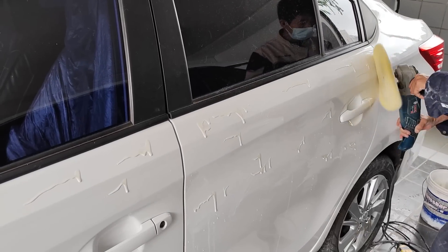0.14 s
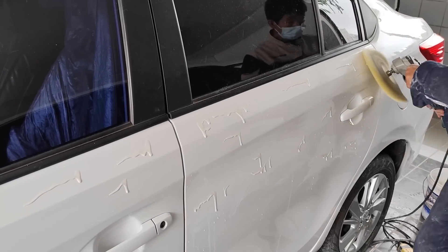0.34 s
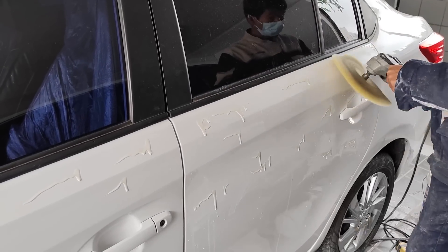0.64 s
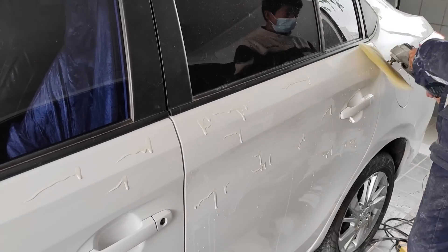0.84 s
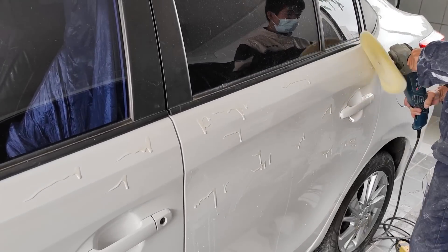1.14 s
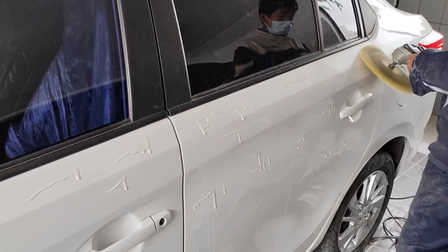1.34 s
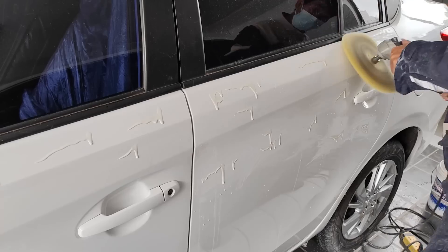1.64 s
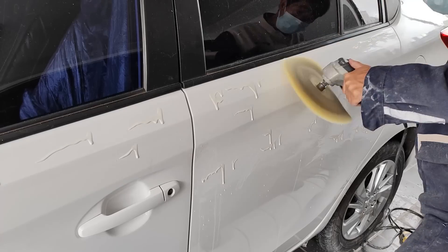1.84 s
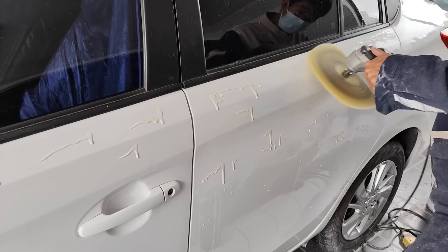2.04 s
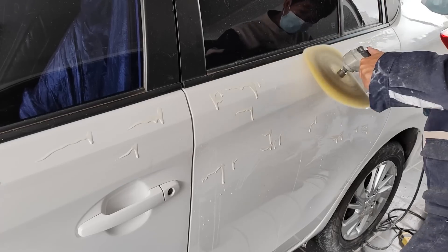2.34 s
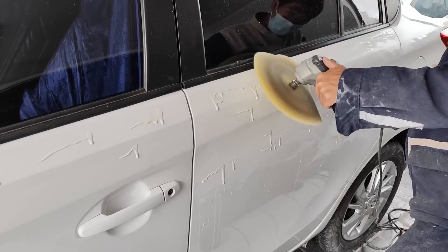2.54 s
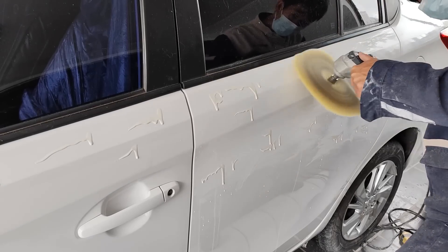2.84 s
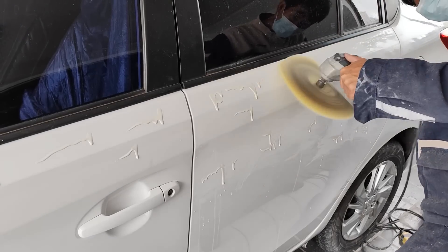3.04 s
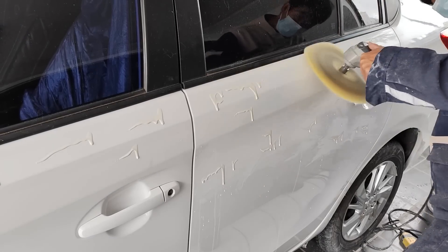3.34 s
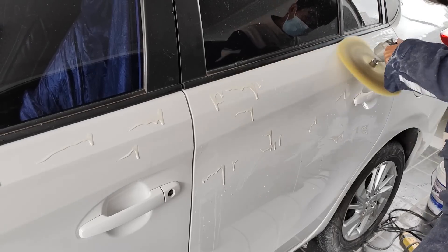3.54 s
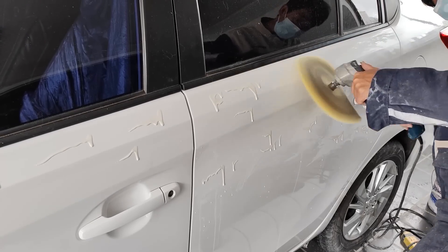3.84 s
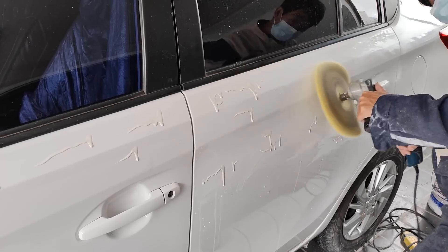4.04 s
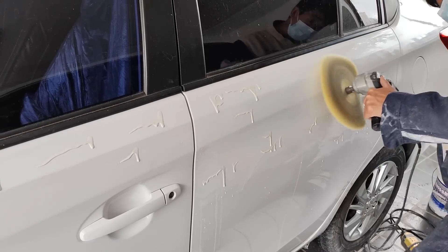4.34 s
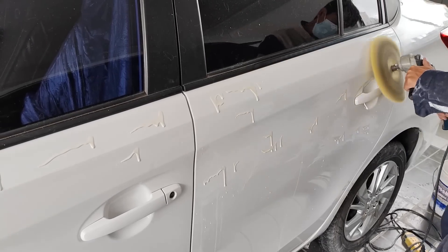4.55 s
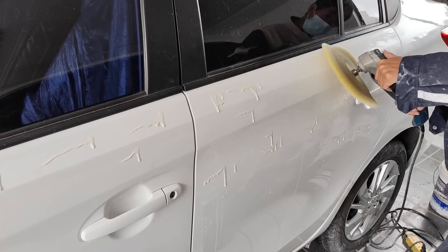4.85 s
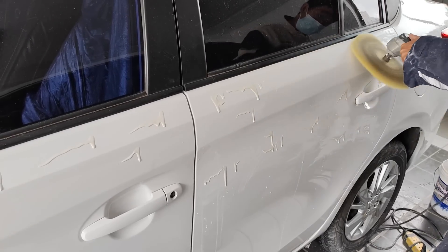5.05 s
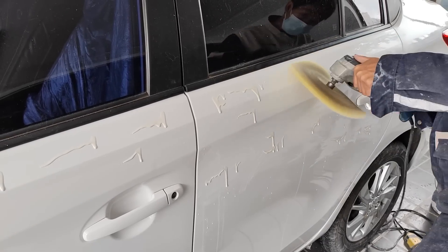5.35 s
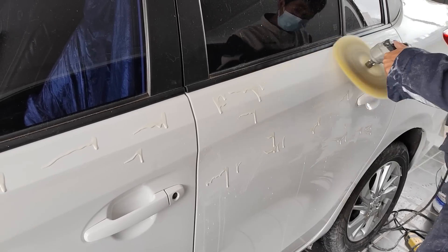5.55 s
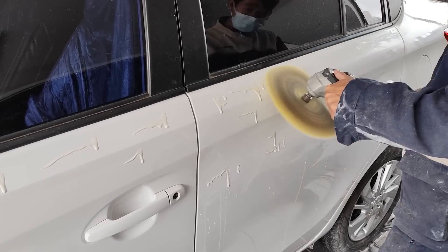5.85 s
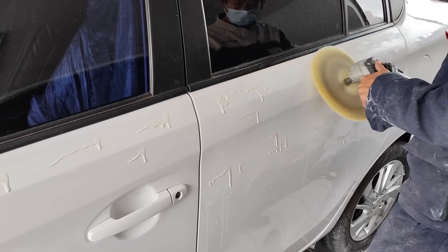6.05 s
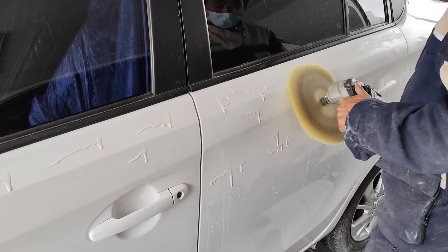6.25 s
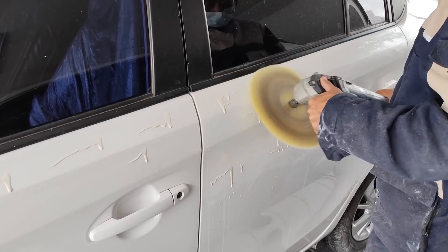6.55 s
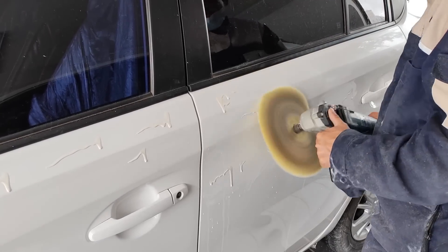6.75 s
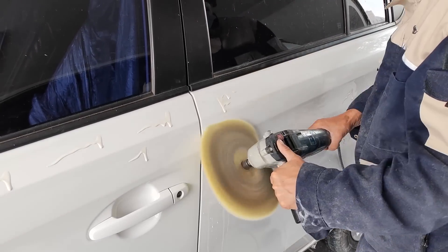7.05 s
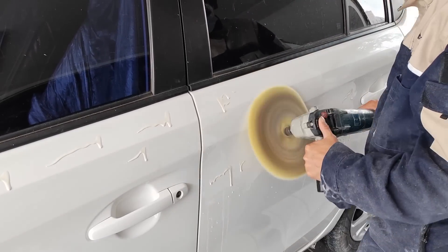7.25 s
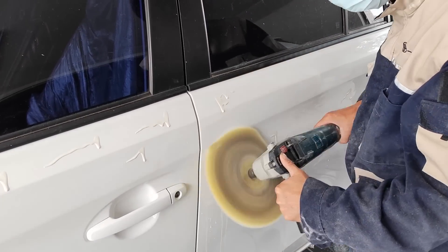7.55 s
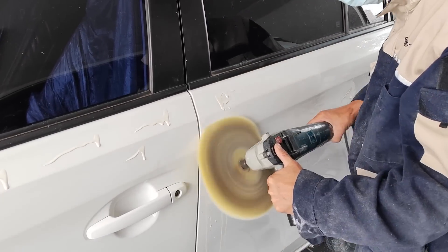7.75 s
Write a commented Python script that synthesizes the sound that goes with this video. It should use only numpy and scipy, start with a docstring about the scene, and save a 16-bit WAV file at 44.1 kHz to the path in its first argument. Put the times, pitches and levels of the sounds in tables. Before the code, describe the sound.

An electric rotary polisher whines shrilly and steadily while its foam pad rubs a car door, with gear rattle, hissing air and small speed sags.

```python
"""In a body shop, an electric rotary polisher buffs a car door: it comes nearer, goes off, then comes closest
near the end. The motor's whine is built from sine waves; it sags and recovers with the pressure on the pad,
and the ripple of the power supply adds further tones beside it. Knocks once a turn and tooth noise make
the gear case ring; shaped noise makes the hiss of cooling air and brushes; the foam pad rubs the door
panel and makes it ring. Steady low tones, low booming and a soft bump lie underneath."""
import sys
import numpy as np
from scipy import signal
from scipy.fft import rfft, irfft, next_fast_len
from scipy.io import wavfile
from scipy.ndimage import uniform_filter1d, map_coordinates

SR = 44100
rng = np.random.default_rng(int(sys.argv[2]) if len(sys.argv) > 2 else 0)


def wav_out(sig):
    """Save sig, one row per channel (or a flat mono array), as 16-bit PCM at SR to the path in sys.argv[1]."""
    wavfile.write(sys.argv[1], SR, np.round(np.clip(np.atleast_2d(sig).T, -1, 1) * 32767).astype(np.int16))


N = 348831
TIME = np.arange(N) / SR   # seconds
WORKING_HZ, RIPPLE_HZ = 1032, 300   # typical pitch of the whine; ripple of the supply
SHAFT_TURNS_PER_CYCLE = .07907   # turns of the geared shaft for each cycle of the whine


def from_db(db):
    """Decibels to gain."""
    return 10 ** (np.asarray(db) / 20)


def rms_one(x):
    """Scale to unit power."""
    return x / np.sqrt(np.mean(np.abs(x) ** 2) + 1e-20)


def in_time(rows):
    """Draw straight lines between the rows of a table: each column at every sample."""
    s, *columns = np.transpose(rows)
    return [np.interp(TIME, s, c) for c in columns]


def at_hz(points, hz):
    """Read a table of frequencies on a logarithmic pitch axis."""
    f, value = np.transpose(points)
    return np.interp(np.log(hz), np.log(f), value)


def drift(rate, size=100):
    """Slow random wandering of spread 1, one value for every `size` samples."""
    r = np.exp(-2 * np.pi * rate * size / SR)
    steps = N // size + 2
    chance = rng.standard_normal(2 * steps)
    # the first half only lets the filter settle
    return rms_one(signal.lfilter([1], [1, -2 * r, r * r], chance)[steps:])


def smooth_up(slow, size=100):
    """Bring slow values to the sample rate."""
    return np.interp(np.arange(N) / size, np.arange(len(slow)), slow)


def waver(depth_db, rate):
    """A level that wanders by chance, in dB."""
    return depth_db * smooth_up(drift(rate))


def bouts(rows, rise_s, fall_s):
    """Gain of events that rise, hold and fall."""
    gain = 0
    for start_s, length_s, level_db in rows:
        rise = (TIME - start_s) / rise_s
        fall = (start_s + length_s - TIME) / fall_s
        gain = gain + from_db(level_db) * np.clip(np.minimum(rise, fall) + .5, 0, 1)
    return gain


def panned(pan_db):
    """Left and right gains for a level difference, at constant power."""
    pair = from_db(pan_db * np.array([[1], [-1]]) / 2)
    return pair / np.sqrt(np.mean(pair ** 2, axis=0))


def widen(x, side_db):
    """Scale the difference between the ears."""
    mid = x.mean(axis=0)
    return mid + from_db(side_db) * (x - mid)


# how alike the two ears hear each frequency: pitch_hz, likeness (0-1)
LIKENESS = [(60, 0.98), (150, 0.955), (300, 0.92), (600, 0.89), (2000, 0.86), (3500, 0.2), (6000, 0.08),
            (9000, 0.16), (14000, 0.1), (15500, 0.8)]
# which ear is louder at each frequency: pitch_hz, left_minus_right_db
LEANING = [(100, 0.5), (2500, -0.5), (5000, -1), (7500, -3), (9500, -4), (11500, -6.5), (13000, -4),
           (15500, 2)]


def spread(mid, side, hz):
    """Mix two unrelated signals into left and right: alike in the bass, mostly diffuse in the treble."""
    alike = np.clip(at_hz(LIKENESS, hz), 0, .999)
    sign = np.array([[1], [-1]])
    pair = np.sqrt((1 + alike) / 2) * mid + np.sqrt((1 - alike) / 2) * side * sign
    return pair * from_db(sign * at_hz(LEANING, hz) / 2)


BINS_HZ = np.maximum(np.fft.rfftfreq(next_fast_len(N, True), 1 / SR), 1)


def noise(spectrum):
    """Stereo noise with its frequencies weighted by a table, rms 1."""
    mid, side = rfft(rng.standard_normal((2, next_fast_len(N, True))))
    coloured = spread(mid, side, BINS_HZ) * from_db(at_hz(spectrum, BINS_HZ))
    return rms_one(irfft(coloured)[:, :N])


def moving_band(x, centre_hz, width_hz, size=512):
    """A resonance of gain 1 whose centre follows a curve, block by block."""
    r = np.exp(-np.pi * width_hz / SR)
    b = (1 - r * r) / 2 * np.array([1, 0, -1])
    state = np.zeros(x.shape[:-1] + (2,))
    out = np.empty_like(x)
    for i in range(0, N, size):
        a = [1, -2 * r * np.cos(2 * np.pi * centre_hz[i] / SR), r * r]
        out[..., i:i + size], state = signal.lfilter(b, a, x[..., i:i + size], zi=state)
    return out


# the hands' grip and the pad's place shift each resonance:
# spread of its pitch (share), spread of its strength (dB), speed of change (per second)
MODE_SWAY, MODE_WAVER_DB, MODE_RATE = .016, 1.5, 4


def resonate(x, modes):
    """Ring side-by-side resonances of alternating sign, each shifting in pitch and strength; rms 1."""
    total = 0
    for k, (hz, width_hz, db) in enumerate(modes):
        strength = from_db(db + waver(MODE_WAVER_DB, MODE_RATE))
        centre_hz = hz * (1 + MODE_SWAY * smooth_up(drift(MODE_RATE)))
        total = total + (-1) ** k * strength * moving_band(x, centre_hz, width_hz)
    return rms_one(total)


def shop(x, t60, wet_db):
    """Direct sound plus a fading tail of reflections from car and walls, different on each side; rms 1."""
    t = TIME[:SR // 2]
    # t60 is the time in seconds in which the tail fades by 60 dB
    tail = rng.standard_normal((2, len(t))) * from_db(-60 * t / t60)
    tail /= np.sqrt(np.sum(tail ** 2, axis=1, keepdims=True))
    echoes = signal.fftconvolve(np.atleast_2d(x), tail, axes=1)[:, :N]
    return rms_one(x + from_db(wet_db) * echoes)


def partial(cycles, order, scatter, flutter_rate, sideband=0):
    """One tone tied to the motor's speed; reflections of the moving tool add to it and make it flutter."""
    hz = order * WORKING_HZ + sideband * RIPPLE_HZ
    paths = []
    for _ in range(2):
        direct = np.exp(2j * np.pi * rng.random())
        reflected = drift(flutter_rate) + 1j * drift(flutter_rate)
        paths.append(direct + scatter * reflected)
    # the phase between the ears wanders as the tool moves
    paths[1] = paths[1] * np.exp(2j * drift(0.9))
    # sidebands slip against their harmonic, so the beating comes and goes
    ears = rms_one(spread(*paths, hz)) * np.exp(1j * sideband * drift(3.1))
    carrier = np.exp(2j * np.pi * (order * cycles + sideband * RIPPLE_HZ * TIME))
    return np.sqrt(2) * np.array([(smooth_up(ear) * carrier).real for ear in ears])


# steady low tones: supply hum, shop hum and, at 328 Hz, the gear shaft's hum: pitch_hz, relative_level_db
HUM = [(300, -75.5), (328, -75.5), (362, -66), (900, -79.5), (1200, -74)]
HUM_CLOSE_DB = -4   # the hum falls away as the worker steps in front of it


def hum(close, waver_db):
    """Wavering tones whose pitch does not follow the motor's speed, a little louder on the left."""
    tones = 0
    for hz, db in HUM:
        wobble = 0.15 * smooth_up(drift(5.2))   # radians
        tone = np.sin(2 * np.pi * (hz * TIME + rng.random()) + wobble)
        tones = tones + np.sqrt(2) * from_db(db + waver(waver_db, rate=7.9)) * tone
    return tones * from_db(np.array([[.8], [-1.8]]) + HUM_CLOSE_DB * close)


# the door skin booms when the pad leans on it: time_s, relative_level_db
BOOM = [(0.0, -76), (0.13, -82), (2.58, -70), (2.77, -77.5), (6.34, -76), (7.62, -87), (7.91, -79)]
# colour of the boom: pitch_hz, relative_level_db
BOOM_SPECTRUM = [(25, -33), (80, -25), (120, -8), (170, 1), (210, -1), (260, 4.5), (330, 7), (500, -24)]
# soft bump on the microphone: centre_s, peak_db
BUMPS = [(1.411, -62)]


def low_end(bump_s):
    """The boom of the door skin is low noise; the dull bump is one smooth pulse of pressure."""
    boom_db, = in_time(BOOM)
    bumps = sum(from_db(db) * np.exp(-((TIME - s) / bump_s) ** 2) for s, db in BUMPS)
    return from_db(boom_db + 4.0) * noise(BOOM_SPECTRUM) + bumps


# the shaft's turning hums through the door: multiple_of_shaft_rate, relative_level_db
SHAFT_HUM = [(4, -78.5), (8, -75.5), (9, -72), (10, -82)]
SHAFT_CLOSE_DB = -4   # change of these tones as the pad moves to the near end of the door
# level of the door's drone at six times the shaft rate: time_s, relative_level_db
DRONE_LEVEL = [(0.0, -76.5), (0.12, -70), (0.32, -79.0), (0.4, -69), (1.2, -77), (1.24, -84), (1.36, -75),
               (1.88, -61.5), (3.2, -72.5), (3.3, -72), (3.46, -58), (3.84, -70), (3.9, -70), (4.26, -70),
               (4.38, -57), (4.68, -88), (4.88, -59), (5.5, -72), (5.56, -60), (6.14, -77), (6.68, -64),
               (6.78, -80), (7.2, -84), (7.3, -60), (7.34, -87), (7.9, -87)]


def shaft_hum(cycles, close):
    """Low tones of the turning shaft; the drone comes and goes as the pad moves over the door."""
    tones = sum(from_db(db) * partial(cycles, k * SHAFT_TURNS_PER_CYCLE, scatter=0.5, flutter_rate=4.1)
                for k, db in SHAFT_HUM)
    drone = partial(cycles, order=6 * SHAFT_TURNS_PER_CYCLE, scatter=0.092, flutter_rate=12)
    drone_db, = in_time(DRONE_LEVEL)
    return from_db(SHAFT_CLOSE_DB * close) * tones + from_db(drone_db - 3.5) * drone


# door panel under the pad: pitch_hz, width_hz, relative_level_db
PANEL = [(302, 52, -11.5), (352, 10.5, -7), (506, 58, -2), (601, 82, 0.5), (749, 68, 0.5), (813, 135, -2),
         (920, 24, 3.5)]
# the door's main ringing tone: pitch_hz, width_hz, relative_level_db
DOOR_MODE = [(563.5, 16.4, 0)]
# colour of the foam's rubbing: pitch_hz, relative_level_db
PAD = [(25, -38), (150, -37), (215, -17.5), (290, -3), (420, -2), (600, 2), (850, -5), (1200, 0),
       (1700, -5.5), (3000, -21)]
# how strongly the rub sounds in the panel: time_s, relative_level_db
RUB = [(0.0, -59), (1.65, -54), (2.88, -62.5), (4.49, -63.5), (4.85, -57), (5.18, -58.5), (7.16, -62.5),
       (7.91, -79)]
# the pad catches and sets the door's main tone ringing: start_s, length_s, level_db
CATCHES = [(.08, 0.086, -58), (.77, .25, -58.5), (1.5, 0.31, -59), (4.54, 0.13, -61), (5.03, 0.26, -57),
           (5.88, 0.057, -53), (7.04, 0.19, -59.5), (7.57, .13, -52.5), (7.8, 0.055, -54)]
CATCH_EDGE_S, DOOR_RING_DB = 0.035, -66.5   # rise and fall of a catch; ringing between the catches
RUB_WAVER_DB, FOAM_WAVER_DB = 1.1, 1.2   # small chance changes of the panel's rub and of the foam's


def pad(knocks, friction):
    """The foam pad rubs the door and passes the gear's shaking into the panel, which rings."""
    rub_db = in_time(RUB)[0] + waver(RUB_WAVER_DB, rate=14)
    steady_ring = from_db(DOOR_RING_DB + waver(3.5, rate=12))
    ringing = np.hypot(steady_ring, bouts(CATCHES, CATCH_EDGE_S, CATCH_EDGE_S))
    panel_push = knocks + friction * rng.standard_normal(N)
    panel = shop(resonate(panel_push, PANEL), t60=1.0, wet_db=-11)
    door_push = knocks + 1.06 * rng.standard_normal(N)
    ring = shop(resonate(door_push, DOOR_MODE), t60=0.09, wet_db=-33.0)
    foam = from_db(-58.0 + waver(FOAM_WAVER_DB, rate=5.2)) * noise(PAD)
    return from_db(rub_db - 1.0) * panel + ringing * ring + foam


def moving_echoes(x, echo_db, sway_s, count=3):
    """Paintwork and glass mirror the moving tool; the shifting delays comb the hiss."""
    out = x.copy()
    for ear in range(2):
        for k in range(count):
            delay_s = (k + 1) * rng.uniform(0.0007, .0013) + sway_s * smooth_up(drift(0.554))
            echo = map_coordinates(x[ear], [(TIME - delay_s) * SR], order=2, mode="mirror")
            out[ear] += from_db(echo_db) * echo
    return out / np.sqrt(1 + count * from_db(echo_db) ** 2)


# a reflection off the paintwork hollows out the rush and slides as the tool moves: time_s, centre_hz, depth_db
HOLLOW = [(0.0, 4900, -6), (0.35, 5350, -3), (1.35, 5270, -8), (1.55, 5950, -7), (1.9, 4800, 0),
          (2.5, 5400, -1), (3.6, 5300, -0.5), (4.2, 4400, -6), (4.6, 5170, -8), (4.9, 5800, -2),
          (5.05, 4500, -1), (5.8, 4453, -1), (6.6, 4500, -7), (6.85, 4730, -8), (7.4, 4520, -2),
          (7.9, 4600, -3)]
HOLLOW_WIDTH_HZ = 650


def hollowed(x):
    """Subtract a narrow band to leave a sliding dip in the middle of the rush."""
    centre_hz, depth_db = in_time(HOLLOW)
    return x - (1 - from_db(depth_db)) * moving_band(x, centre_hz, HOLLOW_WIDTH_HZ)


# colour of the cooling air: pitch_hz, relative_level_db
AIR = [(600, -31), (1300, -9.5), (2000, -0.5), (2550, 5.5), (3100, 1), (3600, 0.5), (4700, 1.5), (5600, -2),
       (8000, -24), (16000, -40)]
# colour of the brushes: pitch_hz, relative_level_db
BRUSH = [(2000, -37.5), (4000, -10.5), (5500, -6), (6500, -3), (7600, 0), (8600, 3), (9400, 5),
         (10100, -1.5), (11300, 3), (12400, 0.5), (13400, -2), (14500, -7.5), (15800, -10.5)]
# colour of the sharp hiss heard from close by: pitch_hz, relative_level_db
SHARP_HISS = [(8000, -33), (10500, 3), (11800, 9), (12500, 13), (13400, -5), (15800, -3)]
# level of the brushes' hiss: time_s, relative_level_db
BRUSH_LEVEL = [(0.0, -47), (0.46, -50), (0.52, -47.5), (0.88, -48.5), (1.44, -47.0), (1.68, -48),
               (1.94, -46), (2.34, -49), (3.32, -46.5), (3.54, -49), (3.78, -46), (3.98, -48.5),
               (4.2, -45.5), (4.8, -51), (4.9, -48), (5.96, -46.5), (6.28, -48.5), (6.52, -45.5),
               (6.94, -48), (7.9, -46.5)]
# relative level far off, and its rise when the tool is close (dB)
AIR_DB, AIR_CLOSE_DB = -47.5, 2.5
SHARP_DB, SHARP_CLOSE_DB = -62, 24
AIR_WAVER_DB = .6   # the rush of air varies only a little


def vents(cycles, close, side_db, ripple_depth, rotor_depth):
    """Cooling air rushes out; the brushes hiss in step with the supply ripple and the rotor."""
    air_db = AIR_DB + AIR_CLOSE_DB * close + waver(AIR_WAVER_DB, rate=10.0)
    brush_db = in_time(BRUSH_LEVEL)[0] + waver(1.0, rate=9)
    # 2 / pi is the average of the rectified wave, so the ripple swings about zero
    ripple = np.abs(np.sin(np.pi * RIPPLE_HZ * TIME)) - 2 / np.pi
    chop = 1 - ripple_depth * ripple + rotor_depth * np.cos(2 * np.pi * cycles)
    rush = moving_echoes(noise(AIR), echo_db=-7.5, sway_s=0.00017)
    air = from_db(air_db) * widen(rush, side_db)
    brushes = from_db(brush_db + 9.0) * moving_echoes(chop * noise(BRUSH), echo_db=-6, sway_s=0.00011)
    sharp = from_db(SHARP_DB + SHARP_CLOSE_DB * close) * chop * noise(SHARP_HISS)
    return hollowed(air + brushes) + sharp


def shaft_knocks(cycles, jitter_s, uneven_db, lag_turns=0):
    """The gear takes up its play once a turn: one click with a little chance in its timing or force."""
    at = np.flatnonzero(np.diff(np.floor(cycles * SHAFT_TURNS_PER_CYCLE - lag_turns)))
    chance = rng.standard_normal((len(at), 2))
    moved = at + np.round(jitter_s * SR * chance[:, 0]).astype(int)
    knocks = np.zeros(N)
    knocks[np.clip(moved, 0, N - 1)] = from_db(uneven_db * chance[:, 1])
    return rms_one(knocks)


# low resonances of the gear case: pitch_hz, width_hz, relative_level_db
CASE_LOW = [(1530, 59, 7.5), (1618, 22, 10), (1785, 130, 5.5)]
# high resonances of the gear case: pitch_hz, width_hz, relative_level_db
CASE_HIGH = [(1915, 120, -1.5), (2032, 71, 6), (2210, 112, 2.5), (2446, 240, -3), (2970, 340, -8)]
# the gear head, heard from close by: pitch_hz, width_hz, relative_level_db
GEAR_HEAD = [(2665, 110, 0), (2930, 280, -0.5), (3610, 170, 0.5)]
# level of the gears' growl: time_s, relative_level_db
GROWL = [(0.0, -49), (0.26, -52), (0.44, -62), (0.6, -48), (0.8, -65), (0.98, -45.5), (1.1, -57),
         (1.48, -52), (1.68, -65), (1.88, -52), (2.3, -66), (3.24, -54.5), (3.46, -65), (3.88, -51),
         (3.94, -74), (4.2, -67), (4.32, -52), (4.4, -80), (4.76, -76), (4.84, -55), (5.02, -63),
         (5.48, -50), (5.56, -73), (5.86, -53), (6.14, -64), (6.24, -54), (6.3, -59), (6.5, -56.5),
         (6.82, -54), (7.9, -51.5)]
# the gears chatter in short bouts: start_s, length_s, relative_level_db
CHATTERS = [(0.0, 0.36, -45.5), (.46, 0.1, -51), (.7, 0.079, -53), (.93, 0.17, -51.5), (1.15, 0.11, -51),
            (3.91, 0.04, -55), (4.13, 0.13, -54), (4.27, 0.083, -48), (4.83, 0.12, -55)]
CHATTER_RISE_S, CHATTER_FALL_S = 0.04, 0.055   # quick start, slower dying away
CHATTER_WAVER_DB = 1.4   # its force is unsteady
CHATTER_GRIND, GROWL_GRIND = .38, .6   # tooth noise mixed into the chatter and the growl
REBOUND_DB = -3.5   # the teeth rebound after each knock
# relative level far off, and its change when the tool is close (dB)
RATTLE_DB, RATTLE_CLOSE_DB = -52.5, -5
RASP_DB, RASP_CLOSE_DB = -74, 26


def gears(knocks, rebounds, close, grind):
    """Knocks, rebounds and grinding teeth ring the gear case; bouts of chatter stand out as a buzz."""
    growl_db, = in_time(GROWL)
    rattle_db = RATTLE_DB + RATTLE_CLOSE_DB * close + waver(2.0, rate=14.5)
    teeth = rng.standard_normal((2, N))
    blows = knocks + from_db(REBOUND_DB) * rebounds
    drive = blows + grind * teeth[0]
    growl = from_db(growl_db - 1.5) * resonate(blows + GROWL_GRIND * teeth[0], CASE_LOW)
    rasp = from_db(RASP_DB + RASP_CLOSE_DB * close) * resonate(drive, GEAR_HEAD)
    rattle = from_db(rattle_db) * resonate(drive, CASE_HIGH)
    case = growl + rasp + rattle
    # the buzz spreads through the door, which blurs the single knocks
    buzz = shop(resonate(blows + CHATTER_GRIND * teeth[1], CASE_HIGH), t60=.06, wet_db=-4)
    force = from_db(2.5 + waver(CHATTER_WAVER_DB, rate=22))
    chatter = force * bouts(CHATTERS, CHATTER_RISE_S, CHATTER_FALL_S) * widen(buzz, side_db=-15)
    return np.std(case) * shop(case, t60=0.18, wet_db=-6) + chatter


# level of the whine's fundamental: time_s, relative_level_db
FIRST_LEVEL = [(0.02, -53.5), (1.47, -49), (1.57, -59), (1.73, -50.5), (2.07, -58), (2.27, -52.5),
               (2.47, -58.5), (2.85, -65), (2.91, -66), (3.01, -58), (3.17, -68), (3.55, -53.5),
               (3.81, -55.5), (3.97, -72), (4.01, -61), (4.31, -65), (4.51, -53), (4.75, -57.0),
               (4.85, -53.5), (5.47, -57.0), (5.54, -72), (5.74, -55.5), (5.88, -74), (6.22, -57),
               (6.3, -67.5), (6.56, -52), (6.76, -67), (6.86, -67.0), (6.92, -57), (7.02, -72),
               (7.1, -57.5), (7.44, -71), (7.52, -64), (7.68, -68.5), (7.72, -60), (7.89, -64)]
# level of the second harmonic's upper sideband: time_s, relative_level_db
SECOND_LEVEL = [(0.02, -50), (0.2, -50.0), (0.7, -61.5), (1.02, -58), (1.19, -55), (1.47, -64), (1.59, -58),
                (1.63, -59.0), (1.93, -50), (2.45, -53), (2.59, -61), (2.79, -50.5), (3.07, -60),
                (3.15, -53), (3.23, -67), (3.39, -55), (3.79, -54.5), (4.09, -55), (4.15, -55),
                (4.49, -52.5), (4.65, -59), (4.75, -54), (4.93, -60), (5.05, -54), (5.48, -55.5),
                (5.8, -50.5), (6.0, -54), (6.06, -51), (6.4, -61), (6.62, -48.0), (6.92, -53), (6.98, -56),
                (7.22, -60), (7.32, -47), (7.38, -57), (7.89, -59)]
# level of the fourth harmonic: time_s, relative_level_db
FOURTH_LEVEL = [(0.02, -57), (0.3, -53), (0.42, -59), (0.48, -50.5), (0.76, -50.5), (0.84, -57),
                (1.06, -50), (1.11, -56), (1.25, -51), (1.41, -53), (1.77, -49), (1.81, -55), (1.87, -48),
                (2.09, -53.5), (2.31, -49.5), (2.53, -55), (2.73, -50.0), (2.79, -57.0), (2.85, -52.5),
                (3.11, -50.5), (3.17, -57), (3.27, -51), (3.69, -53), (3.91, -48.5), (4.01, -60.0),
                (4.17, -58), (4.33, -47.5), (4.37, -58), (4.63, -55), (4.67, -60), (4.83, -53), (4.93, -51),
                (4.99, -50), (5.58, -53.5), (6.04, -47.5), (6.12, -56), (6.18, -52.0), (6.28, -63),
                (6.32, -53.0), (6.62, -48), (6.7, -61), (6.98, -59), (7.1, -48), (7.22, -54.5),
                (7.26, -64.5), (7.36, -56), (7.52, -58), (7.68, -59.5), (7.78, -49), (7.89, -59.5)]
# level of the eighth harmonic: time_s, relative_level_db
EIGHTH_LEVEL = [(0, -42), (0.25, -43.5), (0.5, -55), (1.2, -46), (2.45, -48), (3.6, -47), (4.25, -44.5),
                (4.4, -40), (4.72, -54), (4.9, -46), (6.35, -48.5), (6.52, -42.5), (6.8, -44.5),
                (7.91, -49)]
# weaker tones of the whine: harmonic_number, sideband_number, relative_level_db
OVERTONES = [(1, -1, -82), (1, 1, -63.5), (1, 2, -66), (2, -2, -73.5), (2, -1, -65.5), (2, 2, -58.5),
             (2, 3, -64), (3, 0, -58), (5, 0, -66.5), (6, 0, -57), (6, 1, -62), (7, -1, -59.5), (7, 0, -57),
             (7, 1, -54.5), (7, 2, -67), (8, -2, -59), (8, 1, -55.5), (9, 2, -56.5), (10, -1, -60),
             (10, 0, -44), (10, 1, -53), (11, 0, -55), (12, -2, -55.5), (12, -1, -50.5), (12, 0, -51),
             (12, 1, -63)]
# the second and fourth harmonics are roughened by reflections: strength of scatter, flutters a second
SECOND_SCATTER, SECOND_FLUTTER_RATE = .4, 32
FOURTH_SCATTER, FOURTH_FLUTTER_RATE = .3, 30
# the fourth harmonic beams to the right until the tool is close: left minus right, and its change (dB)
FOURTH_PAN_DB, FOURTH_PAN_CLOSE_DB = -5.5, 16
MESH_DB, MESH_CLOSE_DB = -62.5, 6.5   # relative level of the mesh tone far off, and its rise when close


def whine(cycles, close, count=40):
    """Four strong tones, a ladder of faint overtones and the mesh tone of a gear with `count` teeth."""
    first_db, = in_time(FIRST_LEVEL)
    second_db, = in_time(SECOND_LEVEL)
    fourth_db, = in_time(FOURTH_LEVEL)
    eighth_db, = in_time(EIGHTH_LEVEL)

    first_tone = partial(cycles, order=1, scatter=0.22, flutter_rate=25)
    first = from_db(first_db - 0.5) * widen(first_tone, side_db=-26)
    # the room keeps ringing with the fundamental when its beam points away
    room_tone = partial(cycles, order=1, scatter=1.8, flutter_rate=9)
    lingering = from_db(-68) * widen(room_tone, side_db=11)

    # this sideband lies slightly less than one full ripple step above the harmonic
    second = from_db(second_db + 1.7) * partial(
        cycles, order=2, sideband=0.98, scatter=SECOND_SCATTER, flutter_rate=SECOND_FLUTTER_RATE)

    pan_db = FOURTH_PAN_DB + FOURTH_PAN_CLOSE_DB * close + waver(5.0, rate=2.8)
    fourth_tone = partial(cycles, order=4, scatter=FOURTH_SCATTER, flutter_rate=FOURTH_FLUTTER_RATE)
    fourth = from_db(fourth_db + 1.5) * panned(pan_db) * widen(fourth_tone, side_db=-1.5)

    eighth_tone = partial(cycles, order=8, scatter=0.39, flutter_rate=12)
    eighth = from_db(eighth_db + 1.5) * shop(eighth_tone, t60=0.18, wet_db=-4.5)

    mesh_tone = partial(cycles, order=count * SHAFT_TURNS_PER_CYCLE, scatter=0.99, flutter_rate=8.8)
    mesh = from_db(MESH_DB + MESH_CLOSE_DB * close) * widen(mesh_tone, side_db=-16)

    # the fundamental's own sidebands swell with it
    swell = from_db(0.31 * (first_db + 55.0))
    ladder = 0
    for k, side, db in OVERTONES:
        tone = partial(cycles, k, sideband=side, scatter=0.42, flutter_rate=2.0 * k + 6)
        ladder = ladder + from_db(db) * (swell if k == 1 else 1) * tone
    overtones = from_db(-1.33) * np.std(ladder) * shop(ladder, t60=0.6, wet_db=-8.0)
    return first + lingering + second + fourth + eighth + mesh + overtones


# the shrill ninth harmonic and its ripple sidebands: harmonic_number, sideband_number, relative_level_db
SHRIEK = [(9, -2, -20), (9, -1, -8.5), (9, 0, 1), (9, 1, -5)]
# the beam of the shrill cluster swings about as the tool is turned: time_s, relative_level_db
SHRIEK_LEVEL = [(0.02, -33), (0.16, -31.5), (0.32, -41), (0.36, -39.0), (0.42, -43), (0.46, -40),
                (0.76, -33.0), (0.8, -35.5), (0.96, -35.5), (1.02, -37.5), (1.23, -34), (1.31, -38),
                (1.35, -34.5), (1.69, -36), (1.79, -33.5), (1.89, -37), (2.09, -29.5), (2.17, -37),
                (2.23, -31.5), (2.31, -40.5), (2.43, -32), (2.49, -35.5), (2.55, -29.5), (2.85, -34),
                (2.95, -36), (3.07, -30.5), (3.19, -40.5), (3.35, -33.0), (3.51, -35.5), (3.61, -33.5),
                (3.79, -34), (3.87, -30), (3.95, -35.5), (4.05, -31.5), (4.25, -33.0), (4.29, -37),
                (4.63, -32.5), (4.75, -39.0), (4.95, -33.5), (5.17, -36.0), (5.21, -33), (5.35, -30.5),
                (5.45, -36), (5.52, -32.5), (5.66, -36.5), (5.72, -32.5), (5.82, -36), (5.88, -31),
                (6.06, -35), (6.12, -37), (6.36, -36.5), (6.4, -41.5), (6.82, -28.5), (6.88, -35.5),
                (6.96, -27.5), (7.36, -36), (7.42, -32.5), (7.68, -29.5), (7.74, -36), (7.89, -31)]
# direction of the shrill cluster: time_s, left_minus_right_db
SHRIEK_PAN = [(0.0, -8), (0.63, -0.5), (1.14, -6.5), (2.04, -1), (2.22, -7), (3.03, 0), (4.1, -6.5),
              (5.84, -2.5), (6.85, -8.5), (7.15, -1), (7.37, -6.5), (7.91, -3)]
FLICKER_DB, FLICKER_RATE = 1.3, 9   # each line flickers on its own: spread, changes a second
SHRIEK_SCATTER, SHRIEK_FLUTTER_RATE = .24, 22   # reflections blur it: strength, flutters a second


def shriek(cycles, gain_db, size=4000):
    """The shrill cluster near 9 kHz; its lines beat at the ripple rate and the room smears its glides."""
    lines = 0
    for k, side, db in SHRIEK:
        tone = partial(cycles, k, sideband=side, scatter=SHRIEK_SCATTER, flutter_rate=SHRIEK_FLUTTER_RATE)
        lines = lines + from_db(db + waver(FLICKER_DB, FLICKER_RATE)) * tone
    lines = shop(lines, t60=0.12, wet_db=-2.5)
    # level out the slow swells over `size` samples, so that the level table sets them
    even = lines / np.sqrt(uniform_filter1d(lines ** 2, size, axis=1) + 1e-12)
    level_db, = in_time(SHRIEK_LEVEL)
    pan_db, = in_time(SHRIEK_PAN)
    each_ear_db = np.array([waver(0.7, rate=16) for _ in range(2)])
    ears_db = waver(0.6, rate=14) + each_ear_db
    return from_db(gain_db + level_db + ears_db) * panned(pan_db) * even


# motor whine, sagging as the pad is pressed on and recovering as it is eased: time_s, pitch_hz
PITCH = [(0.02, 1024.0), (0.06, 1020.0), (0.12, 1031.5), (0.24, 1028.5), (0.28, 1041.0), (0.36, 1043.0),
         (0.48, 1028.5), (0.6, 1025.5), (0.82, 1033.5), (0.98, 1028.0), (1.02, 1039.5), (1.17, 1026.0),
         (1.33, 1043.5), (1.37, 1029.5), (1.45, 1025.0), (1.55, 1040.0), (1.63, 1039.0), (1.77, 1022.5),
         (1.87, 1027.0), (1.95, 1021.5), (2.03, 1028.5), (2.13, 1025.5), (2.19, 1035.0), (2.23, 1028.0),
         (2.41, 1028.0), (2.45, 1031.5), (2.61, 1026.5), (2.73, 1045.0), (2.77, 1030.5), (2.81, 1037.5),
         (2.83, 1029.5), (2.91, 1037.0), (3.01, 1026.0), (3.05, 1037.0), (3.25, 1032.5), (3.29, 1038.0),
         (3.37, 1029.0), (3.47, 1037.0), (3.59, 1028.5), (3.79, 1028.0), (3.87, 1032.0), (3.89, 1040.5),
         (3.97, 1038.0), (4.01, 1030.0), (4.15, 1037.0), (4.19, 1030.5), (4.35, 1034.5), (4.57, 1023.5),
         (4.73, 1043.0), (4.79, 1040.5), (4.83, 1028.0), (4.93, 1024.0), (5.01, 1038.0), (5.07, 1029.5),
         (5.25, 1030.5), (5.43, 1028.0), (5.64, 1042.0), (5.74, 1029.0), (5.86, 1033.5), (5.92, 1030.5),
         (6.1, 1043.5), (6.22, 1023.0), (6.32, 1043.5), (6.48, 1024.0), (6.6, 1018.0), (6.68, 1031.5),
         (6.76, 1019.0), (6.78, 1026.5), (6.88, 1027.0), (6.92, 1023.5), (7.04, 1032.5), (7.12, 1042.0),
         (7.18, 1035.0), (7.26, 1049.5), (7.3, 1043.5), (7.32, 1034.0), (7.42, 1027.5), (7.46, 1032.5),
         (7.6, 1024.0), (7.62, 1031.5), (7.68, 1029.5), (7.72, 1038.0), (7.84, 1035.0), (7.89, 1027.5)]
# how close the tool is to the listener, with its vents turning this way: time_s, closeness (0-1)
CLOSENESS = [(0, 0), (1.5, 0), (2.7, 0.53), (3.5, 0.25), (4.7, 0), (6.4, 0.2), (7.05, 0.9), (7.3, 0.67),
             (7.5, 1), (7.91, 0.8)]
# the pad grips and slips, so the speed never rests: spread (Hz), changes a second
GRIP_HZ, GRIP_RATE = 1.6, 20
# the sound narrows as the tool comes close: side gain far off, and its change (dB)
SIDE_DB, SIDE_CLOSE_DB = -1.5, -18
REBOUND_TURNS = .38   # delay of a rebound after its knock, as a share of a turn


def scene():
    """The motor's speed, with a slight shudder, drives the whine, the gears, the shaft and the brushes."""
    pitch_hz, = in_time(PITCH)
    close, = in_time(CLOSENESS)
    shudder = .0015 * smooth_up(drift(70))
    grip_hz = GRIP_HZ * smooth_up(drift(GRIP_RATE))
    # running count of the motor's cycles
    cycles = np.cumsum((pitch_hz + grip_hz) * (1 + shudder)) / SR
    side_db = SIDE_DB + SIDE_CLOSE_DB * close
    knocks = shaft_knocks(cycles, jitter_s=.00002, uneven_db=1.0)
    rebounds = shaft_knocks(cycles, jitter_s=.00003, uneven_db=0.0, lag_turns=REBOUND_TURNS)

    background = hum(close, waver_db=2.2) + low_end(bump_s=0.002)
    door = shaft_hum(cycles, close) + pad(knocks, friction=1.0)
    hiss = vents(cycles, close, side_db, ripple_depth=1.0, rotor_depth=0.041)
    gearing = widen(gears(knocks, rebounds, close, grind=1.0), side_db)
    motor = whine(cycles, close) + shriek(cycles, gain_db=0.54)
    return background + door + hiss + gearing + motor


CUTOFF_HZ = 15750


def record(dry):
    """The microphone sheds the deep bass, and the top is cut steeply."""
    bass_cut = signal.butter(1, 55, "high", fs=SR, output="sos")
    top_cut = signal.ellip(12, .1, 80, CUTOFF_HZ, fs=SR, output="sos")
    return signal.sosfilt(top_cut, signal.sosfilt(bass_cut, dry))


dry = scene()
out = record(dry)
wav_out(out)
```